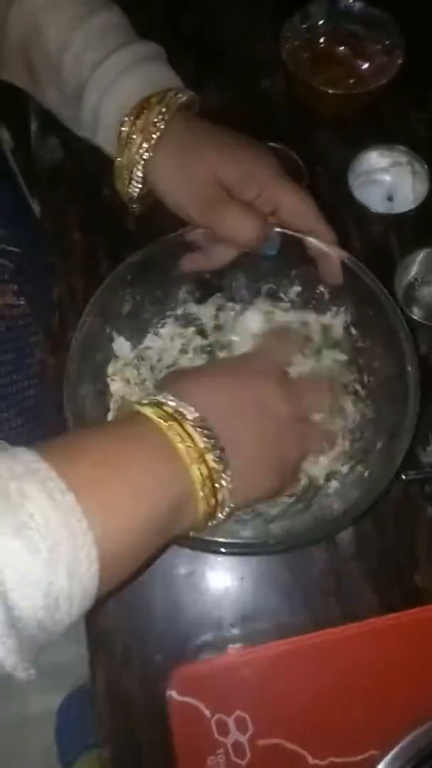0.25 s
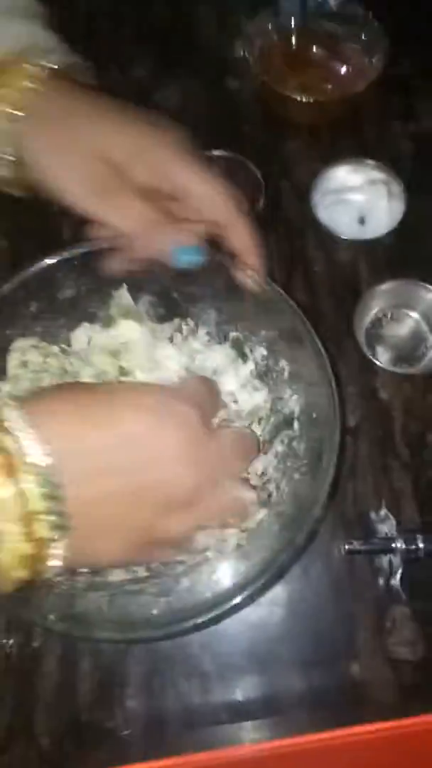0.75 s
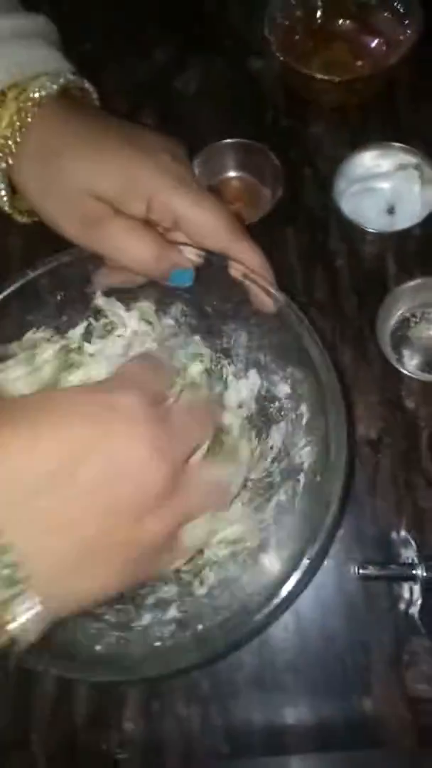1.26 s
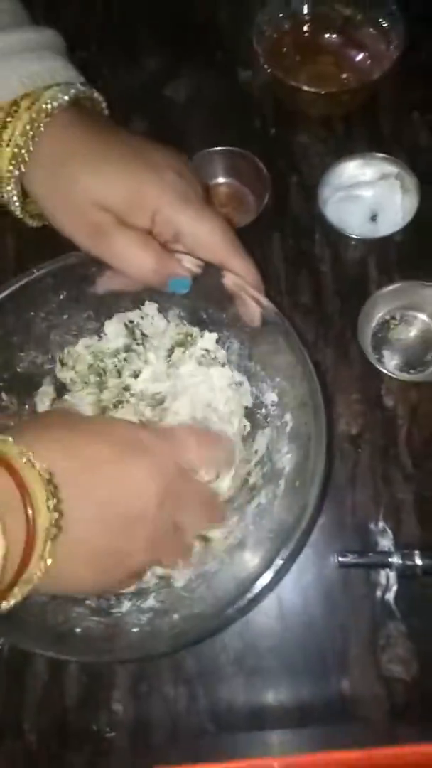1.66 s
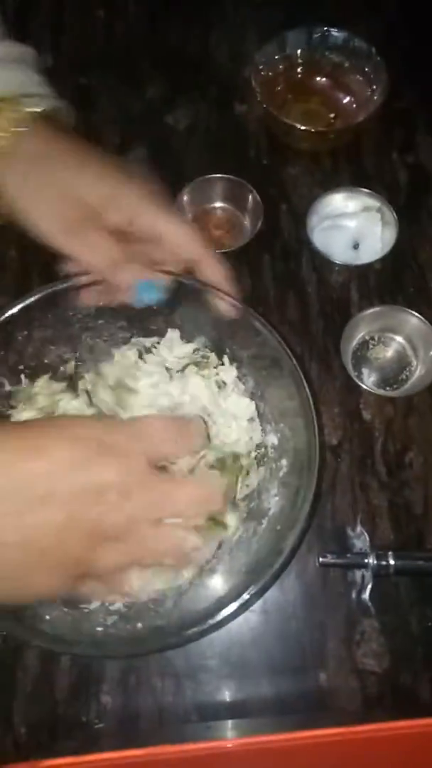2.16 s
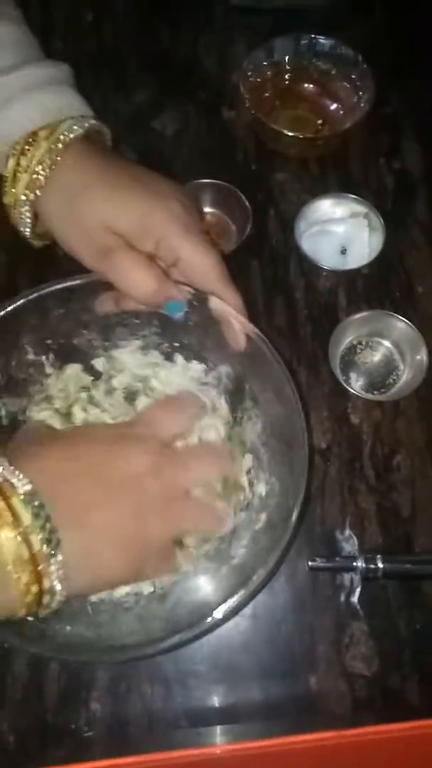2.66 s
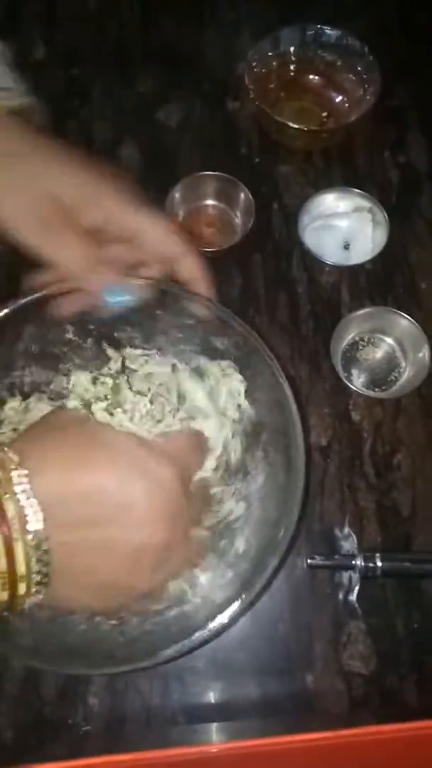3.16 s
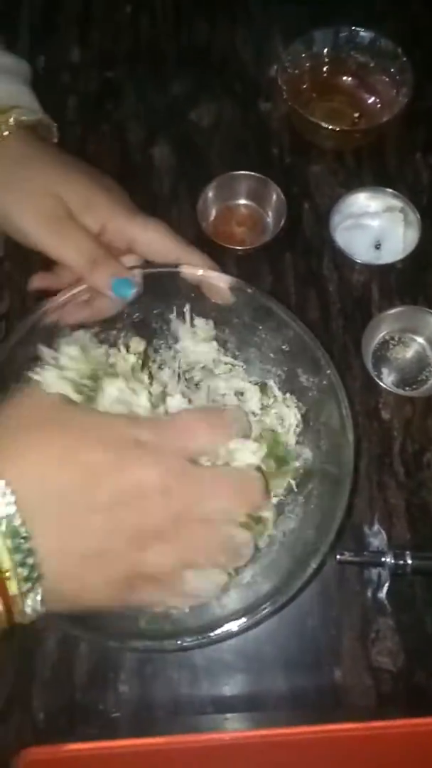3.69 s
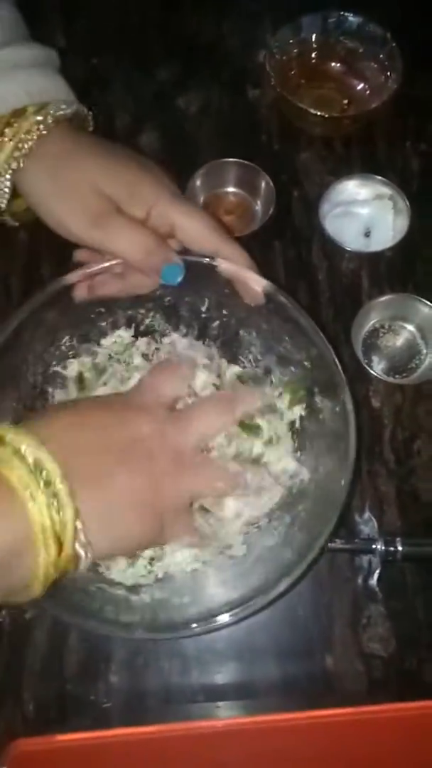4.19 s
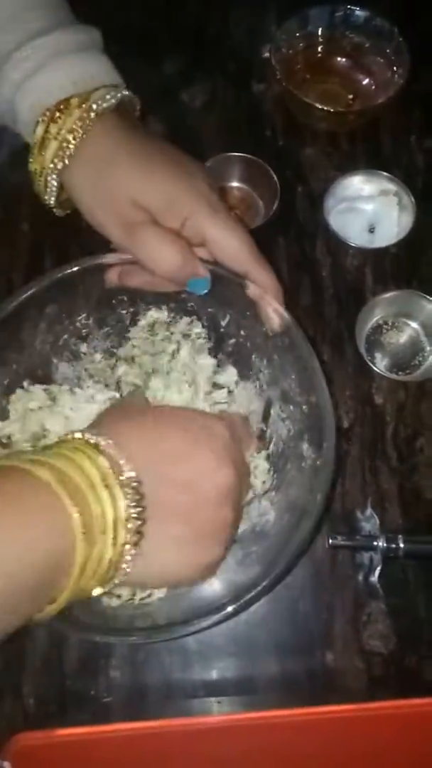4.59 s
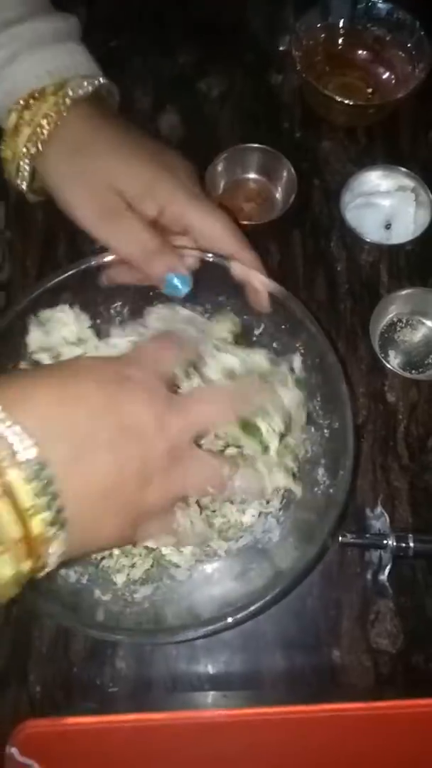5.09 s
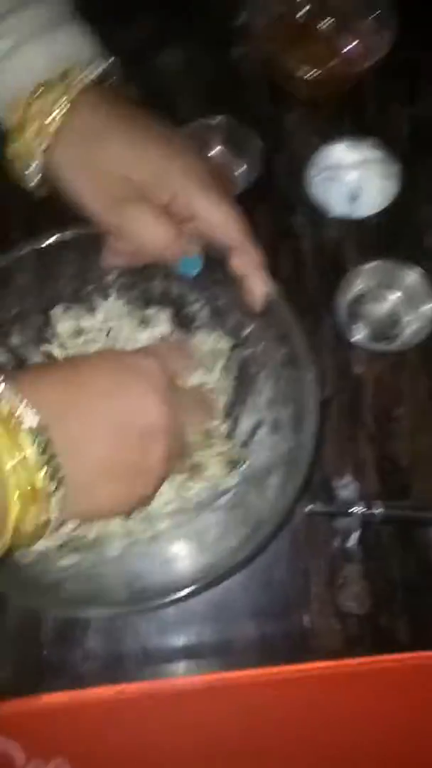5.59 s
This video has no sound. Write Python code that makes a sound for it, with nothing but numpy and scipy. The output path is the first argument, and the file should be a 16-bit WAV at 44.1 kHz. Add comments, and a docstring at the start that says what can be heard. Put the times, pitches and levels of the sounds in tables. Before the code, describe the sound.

A hand kneads leaves and flour in a glass bowl with a soft rustle. Bangles clink together and hit the rim in uneven clusters, and the bowl knocks on the counter. A brief drag makes the glass ring, a few stems snap, and the loudest knocks come in the second half. It sounds close, in a hard-walled kitchen with a faint low hum.

```python
"""In a hard-walled kitchen, a hand kneads leaves and flour in a glass bowl on a stone counter.
Bangles clink on each other, strike the rim and drag along it, making the glass ring.
The bowl knocks and rocks on the counter, loose beads shake and leaf stems snap.
The mix rustles over a wavering low hum and a few faint, narrow hisses."""
import sys
import numpy as np
from scipy import signal
from scipy.fft import rfft, irfft
from scipy.io import wavfile

SR = 44100
rng = np.random.default_rng(int(sys.argv[2]) if len(sys.argv) > 2 else 0)


def output_pcm(signal):
    """Save a mono or channel-first signal as 16-bit PCM at the path in sys.argv[1].

    Samples are clipped to [-1, 1] before scaling.
    """
    pcm = np.clip(np.atleast_2d(signal).T, -1, 1) * 32767
    wavfile.write(sys.argv[1], SR, np.round(pcm).astype(np.int16))


N = 257663

# Bangle hits bangle: t/s, level/dB
CLINKS = [(0.0464, -48), (0.2006, -20.5), (0.2328, -26.5), (0.3366, -41.5), (0.531, -46.5), (1.5188, -30),
          (1.554, -35), (1.632, -43), (1.6563, -32), (1.7187, -28), (2.0625, -43.5), (2.276, -37),
          (2.2942, -36), (2.4567, -42), (2.5117, -26), (2.5957, -27.5), (2.877, -53), (3.4455, -59.5),
          (3.717, -34.5), (4.006, -42), (4.078, -44.5), (4.111, -53), (4.1674, -31), (4.4986, -28),
          (4.708, -45), (5.043, -24.5), (5.1582, -44.5), (5.286, -44.5), (5.3846, -31.5), (5.434, -37),
          (5.469, -36), (5.5564, -35.5), (5.583, -48), (5.6803, -31.5), (5.7002, -28.5)]
# Bangle hits rim: t/s, level/dB, dullness/(dB per octave), boost of the two tones near 2700 Hz/dB
RIM_HITS = [(0.181, -56, 8, -7), (0.1962, -26, 2.5, -14), (0.1995, -18, 1.5, 4.5),
            (0.2316, -20.5, -4.5, -11), (0.5545, -42.5, 6.5, 3), (1.4849, -25, -3, -3),
            (1.5313, -32, 3.5, -1), (1.5536, -33, 7, -15.5), (1.6553, -32, 3.5, -4), (1.703, -24, 4, -9),
            (1.9637, -44.5, 8, -1), (2.0764, -46, 3, -5), (2.1198, -34, -3.5, -3), (2.1989, -33, 3, -2.5),
            (2.596, -27.5, 1.5, -10), (3.0127, -45.5, -4.5, -1), (3.4425, -59, -23, 8),
            (3.4935, -47.5, 9.5, -1), (3.5551, -49, -13, -7), (3.5802, -52.5, 10.5, 0.5),
            (3.656, -45.5, 2, 4), (4.1674, -17.5, -2.5, -10), (4.1985, -21.5, 4, -8.5),
            (4.2345, -27, 0.5, -6.5), (4.4027, -39, -15, 2.5), (4.5505, -32, 2.5, -3),
            (4.6402, -45, 1.5, -1.5), (4.9416, -54, -7.5, 12.5), (5.3762, -30.5, 0.5, -7),
            (5.4729, -36.5, -10, 3.5), (5.5843, -40, -11.5, 7), (5.6998, -39, -0.5, 7)]
# The glass bowl's own tones: f/Hz, level/dB, t60/s (the time to fade by 60 dB)
BOWL_TONES = [(616, -20.5, 0.34), (1527, -14.5, 0.14), (1580, -27.5, 0.21), (2675, -27, 0.47),
              (2740, -7, 0.11), (4170, -30, 0.1), (4196, 1, 0.074), (4293, -13.5, 0.098),
              (5430, -11.5, 0.023), (6007, -13.5, 0.08), (7860, -31, 0.076)]
# Bowl hits counter: t/s, level/dB, dullness/(dB per octave), rocking time/s, boom/dB
KNOCKS = [(.196, -28.5, -6, 0.033, -91), (0.227, -26, 12, 0.035, -48), (0.556, -50.5, 8, 0.037, -49),
          (1.516, -35, 3.5, 0.066, -52), (1.654, -33.5, 9.5, 0.042, -60), (1.718, -44, 15.5, .05, -78),
          (1.959, -43.5, 6.5, 0.054, -107), (2.481, -35.5, 6, 0.03, -42), (2.598, -40.5, 0, 0.039, -63.5),
          (3.485, -44.5, 4.5, 0.13, -66), (3.658, -47.5, 5, .05, -62.5), (4.199, -14, -6.5, 0.018, -41.5),
          (4.222, -13, -4.5, 0.16, -46.5), (4.709, -58.5, 9, .03, -59.5), (5.3006, -15, 0, 0.01, -53),
          (5.32, -36.5, 11, 0.12, -75)]


def from_db(db):
    """Turn decibels into a gain."""
    return 10 ** (np.asarray(db) / 20)


def rms_one(x):
    """Scale to an average (rms) level of 1."""
    return x / np.sqrt(np.mean(x ** 2) + 1e-20)


def at_hz(points, hz):
    """Read a curve between its points, with octaves evenly spaced."""
    point_hz, values = np.transpose(points)
    return np.interp(np.log(hz), np.log(point_hz), values)


def drift(per_second):
    """A smooth random wander, roughly 1 up or down."""
    count = int(N / SR * per_second) + 2
    return np.interp(np.arange(N), np.linspace(0, N, count), rng.standard_normal(count))


def band(x, low_hz, high_hz):
    """Keep the sound between two frequencies."""
    return signal.sosfilt(signal.butter(3, [low_hz, high_hz], "band", fs=SR, output="sos"), x)


def ring(clicks, hz, t60):
    """A resonance: each click starts a fading tone of its own height."""
    decay, angle = from_db(-60 / (t60 * SR)), 2 * np.pi * hz / SR
    return signal.lfilter([0, np.sin(angle)], [1, -2 * decay * np.cos(angle), decay ** 2], clicks + 1e-18)


def coloured(x, spectrum):
    """Shape the lows and highs, then scale to level 1."""
    hz = np.fft.rfftfreq(N, 1 / SR) + 1
    return rms_one(irfft(rfft(x) * from_db(at_hz(spectrum, hz)), N))


def stereo_noise(alike):
    """Left and right white noise, from unrelated (0) to the same (1)."""
    mid, side = rng.standard_normal((2, N))
    return np.sqrt(1 + alike) * mid + np.sqrt(1 - alike) * side * np.array([[1], [-1]])


def swells(times, lengths, levels_db, rise):
    """A gain made of smooth humps; rise is the share of each before its top."""
    t, gain = np.arange(N) / SR, 0
    for top, span, db in zip(times, lengths, levels_db):
        ramp = np.interp(t, [top - rise * span, top, top + (1 - rise) * span], [0, 1, 0])
        gain += from_db(db) * np.sin(np.pi / 2 * ramp) ** 2
    return gain


def dying(times, db, t60):
    """A gain that jumps at each time and dies away."""
    jolts = np.zeros(N)
    jolts[(times * SR).astype(int)] = from_db(db)
    return signal.lfilter([1], [1, -from_db(-60 / (t60 * SR))], jolts + 1e-18)


def struck(times, level_db, dull_db, tones, boost_db, centre_hz, spread_db, crack_db, crack_t60,
           bounces, bounce_s, bounce_db, fade_db):
    """Blows and their quick bounces ring every tone; dull blows favour tones below centre_hz."""
    late = np.c_[np.zeros(len(times)), rng.random((len(times), bounces))]   # share of bounce_s
    at = np.clip((times[:, None] + late * np.reshape(bounce_s, (-1, 1))) * SR, 0, N - 1).astype(int)
    touch_db = level_db[:, None] + (late > 0) * bounce_db + late * fade_db
    pan_db = 2.0 * rng.standard_normal(len(times))   # blows land a little left or right
    sides = from_db(np.outer([.5, -.5], pan_db))[:, :, None]
    luck = rng.standard_normal((len(times), len(tones) + 1, 2, bounces + 1))
    contact_crack = (centre_hz, crack_db, crack_t60)
    out = np.zeros((2, N))
    for k, (hz, tone_db, t60) in enumerate(tones + [contact_crack]):
        octaves = np.clip(np.log2(hz / centre_hz), -1.5, 1.5)
        colour_db = tone_db + boost_db(k) - dull_db * octaves + np.zeros(len(times))
        uneven_db = spread_db * np.moveaxis(luck[:, k], 1, 0)   # varies by side and by touch
        clicks = np.zeros((2, N))
        clicks[:, at] = sides * from_db(touch_db + colour_db[:, None] + uneven_db)
        out += ring(clicks, hz, t60)
    return out


def rustle():
    """Leaves and flour hiss in clumps of grains; pushed along the glass they scrape lower."""
    # Strokes of the hand: loudest t/s, length/s, hiss/dB, scrape/dB
    strokes = [(0.005, 0.32, -58, -64.5), (0.41, 0.63, -52, -54), (0.79, 0.41, -64.5, -77),
               (1.162, 0.37, -61, -73), (1.327, 0.17, -63, -75), (1.726, 0.71, -60.5, -51.5),
               (2.297, 0.43, -59, -65.5), (2.855, 1, -54.5, -57.5), (3.311, 0.2, -56.5, -68.5),
               (3.577, 0.52, -59.5, -67), (4.408, 0.73, -53, -45.5), (4.986, 0.15, -60, -90),
               (5.565, 0.75, -53, -60)]
    # Colour of the rustle: f/Hz, level/dB
    spectrum = [(150, -42), (250, -11), (292, -6), (501, -13.5), (618, 5.5), (1080, -15), (1350, 4),
                (2200, -3), (4700, 9), (6100, -0.5), (7300, -23.5), (16000, -52)]
    clumps = from_db(3 * drift(25))
    sizes = from_db(3.5 * np.minimum(rng.exponential(1, N), 4))
    grains = sizes * (rng.random(N) < 2500 / SR) * clumps
    flicker = from_db(3.2 * drift(22))
    mix = flicker * coloured(stereo_noise(0.43) * (0.81 + grains), spectrum)
    times, lengths, hiss_db, scrape_db = np.transpose(strokes)
    hiss = swells(times, lengths, hiss_db, rise=0.5) * rms_one(band(mix, 2800, 20000))
    scrape = swells(times, lengths, scrape_db, rise=0.5) * rms_one(band(mix, 160, 2700))
    return hiss + scrape


def narrowed(noise, hz, width_hz):
    """Noise passes twice through one resonance and takes on its pitch."""
    t60 = np.log(1000) / (np.pi * width_hz)
    return rms_one(ring(ring(noise, hz, t60), hz, t60))


def hum():
    """A low hum wavers; at each knock the counter booms at the same pitch."""
    # Loudness of the hum: t/s, level/dB
    loudness = [(0.0, -57), (0.3, -65.5), (0.76, -60), (0.83, -73.5), (1.1, -62.5), (1.48, -82),
                (2.16, -72), (2.44, -76), (2.8, -70.5), (3.25, -57.5), (3.76, -56), (4.02, -57),
                (4.14, -59), (4.95, -55.5), (5.24, -76), (5.64, -58), (5.84, -68)]
    wavering = from_db(np.interp(np.arange(N) / SR, *np.transpose(loudness)))
    knock_times, *_, boom_db = np.transpose(KNOCKS)
    booms = dying(knock_times, boom_db, t60=0.35)
    rumble = band(stereo_noise(0.85), 70, 260)
    return (wavering + booms) * narrowed(rumble, hz=135, width_hz=56)


def hisses():
    """Narrow bands of noise swell, flicker and fade."""
    # Each hiss: f/Hz, width/Hz, start t/s, end t/s, level/dB
    hiss_bands = [(3036, 116, 0, 2.3, -64.5), (1340, 120, 0.9, 1.55, -78), (1367, 28, 2.5, 4.66, -75.5),
                  (1140, 290, -1.47, .17, -51)]
    t, out = np.arange(N) / SR, 0
    for hz, width_hz, start, stop, db in hiss_bands:
        swell = np.sin(np.pi * np.clip((t - start) / (stop - start), 0, 1))
        flicker = from_db(2 * drift(24))
        out += from_db(db) * swell * flicker * narrowed(stereo_noise(0.093), hz, width_hz)
    return out


def background():
    """A faint, steady noise lies under everything."""
    # Colour of the noise: f/Hz, level/dB
    spectrum = [(20, 1.5), (45, -9), (130, 2), (300, 0.5), (1070, -11.5), (1400, -5.5), (2500, -21),
                (3400, -21.5), (4700, -1), (5700, -9), (7300, -29.5), (14400, -29.5), (16000, -49.5)]
    return from_db(-69) * coloured(stereo_noise(0.45), spectrum)


def clinks():
    """Bangles hit each other; each clink catches other bangles, so its strongest tones change."""
    # A bangle's own tones: f/Hz, level/dB, t60/s
    bangle_tones = [(4300, -18.5, 0.084), (4240, -18, 0.033), (4610, 5.5, 0.025), (5060, -0.5, 0.019),
                    (5200, -0.5, 0.0096), (5810, -5.5, 0.029), (6763, -7.5, 0.049), (8100, -15, 0.01),
                    (8620, -10.5, 0.027), (9540, -15.5, .03), (9870, -33, 0.035), (11410, -20.5, 0.05),
                    (12600, -23.5, .03), (13000, -7, 0.025), (13800, -10, 0.042), (15000, -4, .04)]
    sizes = (1, .97, 1.025)   # relative diameters, taken in turn
    caught_db = 3 * rng.standard_normal((len(CLINKS), 20))
    out = 0
    for first, size in enumerate(sizes):
        turn = slice(first, None, len(sizes))
        times, db = np.transpose(CLINKS[turn])
        tones = [(hz / size, tone_db, t60) for hz, tone_db, t60 in bangle_tones]
        out += struck(times, db - 15, dull_db=-0.5, tones=tones, boost_db=lambda k: caught_db[turn, k],
                      centre_hz=8880, spread_db=5.5, crack_db=-6.3, crack_t60=0.0016,
                      bounces=30, bounce_s=0.03, bounce_db=-3, fade_db=-19)
    return out


def beads(tone_count=24, ring_cycles=180):
    """Beads and thin rings tick and jingle, on their own and after every bangle hit."""
    # Shakes of the loose beads: loudest t/s, length/s, level/dB
    shakes = [(0.293, 0.23, -67), (.54, 0.15, -72), (1.146, 0.16, -68), (1.54, 0.15, -57),
              (1.776, 0.51, -73), (2.168, 0.16, -52.5), (2.297, 0.14, -64), (2.667, 0.71, -71),
              (3.543, 0.23, -77.5), (4.235, 0.19, -55.5), (4.487, 0.52, -67), (5.58, 0.072, -64),
              (5.747, 0.1, -80)]
    clink_times, clink_db = np.transpose(CLINKS)
    rim_times, rim_db = np.transpose(RIM_HITS)[:2]
    shaking = swells(*np.transpose(shakes), rise=0.55)
    shaking += dying(clink_times, clink_db - 20, t60=0.08)
    shaking += dying(rim_times, rim_db - 31, t60=0.08)
    ticks = (rng.random(N) < 5000 / SR) * rng.standard_normal((2, N))
    ticks *= from_db(3.5 * drift(80)) * shaking
    pitches = np.geomspace(4600, 15400, tone_count) * (1 + 0.03 * rng.standard_normal(tone_count))
    chosen = rng.integers(0, tone_count, N)   # each tick rings one pitch
    jingle = sum(ring(ticks * (chosen == k), hz, ring_cycles / hz) for k, hz in enumerate(pitches))
    return band(from_db(-5) * ticks + from_db(-9.5) * jingle, 3800, 16600)


def rim_hits():
    """Bangles strike the glass; a hit near a still point of the 2700 Hz tones hardly wakes them."""
    times, db, dull_db, pair_db = np.transpose(RIM_HITS)
    return struck(times, db - 3.5, dull_db, BOWL_TONES, boost_db=lambda k: pair_db * (k in (3, 4)),
                  centre_hz=3920, spread_db=6.5, crack_db=-3, crack_t60=0.0049,
                  bounces=5, bounce_s=0.007, bounce_db=-7, fade_db=1)


def knocks():
    """The bowl's heavy base lands and rocks on the counter with broad, soft touches."""
    # Tones of the bowl on the counter: f/Hz, level/dB, t60/s
    counter_tones = [(142, -15, .1), (320.5, -6.5, 0.032), (502, -6, 0.054), (565, -17.5, 0.23),
                     (667, -0.5, 0.025), (867, 7.5, 0.011), (982, 0.5, 0.0088), (1242, -7, 0.05),
                     (1760, -2, 0.012), (2340, -23, .03)]
    times, db, dull_db, rocking_s, _ = np.transpose(KNOCKS)
    blows = struck(times, db - 18, dull_db, counter_tones, boost_db=lambda k: 0,
                   centre_hz=637, spread_db=5, crack_db=-11, crack_t60=0.0026,
                   bounces=70, bounce_s=rocking_s, bounce_db=-5.5, fade_db=-5.5)
    return band(blows, 215, 4400)


def drags(attack_s=0.017, fade_db_per_s=156):
    """Bangles and fingers stick and slip on the glass; a dull drag mostly rings its second tone."""
    # Each drag: start t/s, hold/s, level/dB, dullness/(dB per octave)
    rubs = [(1.5, 0.58, -60.5, 15.5), (2.099, 0.19, -43, 13.5), (2.47, 0.57, -61, 0.5),
            (3.451, .25, -55.5, 12), (3.8, 0.064, -76, 18.5), (4.898, 0.088, -70.5, 3.5),
            (5.5, 0.29, -65, 7)]
    slips = (rng.random(N) < 900 / SR) * rng.standard_normal(N) * from_db(2 * drift(40))
    sustain = 2.5   # rubbing feeds each tone, so it lasts this many times longer
    tones = np.array([from_db(db) * ring(slips, hz, t60 * sustain) for hz, db, t60 in BOWL_TONES])
    pitches = np.array(BOWL_TONES)[:, 0]
    octaves_away = np.abs(np.log2(pitches / pitches[1]))
    t, out = np.arange(N) / SR, 0
    for start, hold, db, dull_db in rubs:
        onset = np.clip((t - start) / attack_s, 0, 1)
        level = from_db(db - fade_db_per_s * np.maximum(t - start - hold, 0))
        out += onset * level * rms_one(from_db(-dull_db * octaves_away) @ tones)
    return out


def snaps(splinters=6, splinter_s=0.004):
    """Leaf stems break: a dry crack, then a few splinters with hardly any ring."""
    # Each breaking stem: t/s, level/dB
    stems = [(2.9697, -28.5), (3.0375, -18), (3.155, -31), (4.5774, -33), (4.7289, -21)]
    times, db = np.transpose(stems)
    late = np.c_[np.zeros(len(times)), rng.random((len(times), splinters))]
    at = ((times[:, None] + late * splinter_s) * SR).astype(int)
    clicks = np.zeros(N)
    clicks[at] = from_db(db[:, None] - 13 * (late > 0) - 5.5 * late)
    return band(ring(clicks, hz=4360, t60=0.0016), 3060, 6300)


def kitchen_echo(x, first_echo_s=0.0033, build_s=0.016):
    """Echoes off the hard walls blur into noise that builds up, then dies band by band."""
    # How long the room rings: f/Hz, t60/s
    ring_times = [(100, 0.4), (400, 0.66), (1000, 0.79), (2500, 0.61), (5000, 0.48), (8000, 0.22),
                  (16000, 0.33)]
    t = np.arange(SR) / SR
    edges_hz = 45 * 2 ** np.arange(0, 8.6, .5)
    white, tail = rng.standard_normal((2, 2, SR)), 0
    for k, (low, high) in enumerate(zip(edges_hz, edges_hz[1:])):
        noise = signal.sosfilt(signal.butter(2, [low, high], "band", fs=SR, output="sos"), white[k % 2])
        tail += noise * from_db(-60 * t / at_hz(ring_times, np.sqrt(low * high)))
    build_up = 1 - np.exp(-np.maximum(t - first_echo_s, 0) / build_s)
    return signal.fftconvolve(x.mean(axis=0)[None], tail * build_up / np.sqrt(SR), axes=1)[:, :N]


def scene():
    """Add up all the sounds; the hits, drags and snaps also echo."""
    glass = band(rim_hits() + drags(), 757, 8590)   # small things give off no bass
    bright = glass + band(clinks(), 2700, 14000) + snaps()
    thuds = knocks()
    echo = kitchen_echo(from_db(7) * bright + from_db(9.5) * thuds)
    return bright + thuds + echo + background() + beads() + rustle() + hum() + hisses()


def record(dry, cutoff_hz=17250):
    """Two microphone openings hear each pitch at their own level and phase; the top treble is cut."""
    # How much louder the left side is: f/Hz, level/dB
    balance = [(60, 5), (130, 5.5), (300, 6.5), (700, 3), (1300, 7.5), (2500, 3.5), (4300, 0.5), (8000, 5),
               (15000, 6)]
    # How far the left side's wave runs ahead: f/Hz, phase/rad
    lead = [(60, 0.084), (400, 0.42), (860, 1.5), (1500, 0.94), (2700, 1.66), (4200, 1.43), (7000, 1.92),
            (15000, 1.1)]
    hz = np.fft.rfftfreq(N, 1 / SR) + 1
    left = from_db(at_hz(balance, hz) / 2) * np.exp(.5j * at_hz(lead, hz))
    heard = irfft(rfft(dry) * np.array([left, 1 / left]), N)
    return signal.sosfilt(signal.cheby2(12, 70, cutoff_hz, fs=SR, output="sos"), heard)


dry = scene()
out = record(dry)
output_pcm(out)
```